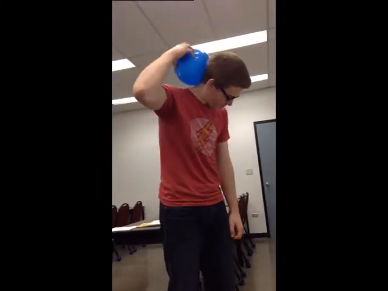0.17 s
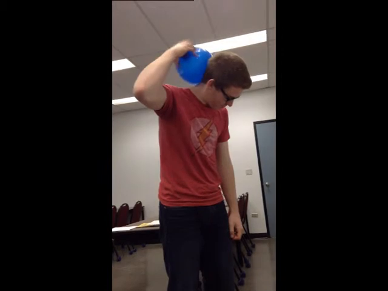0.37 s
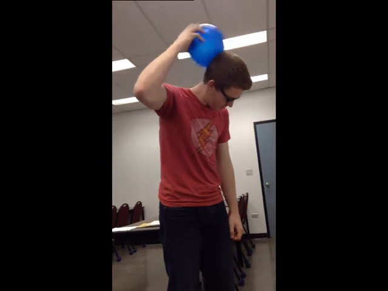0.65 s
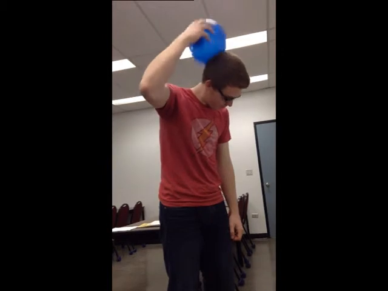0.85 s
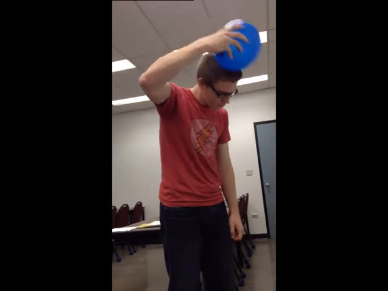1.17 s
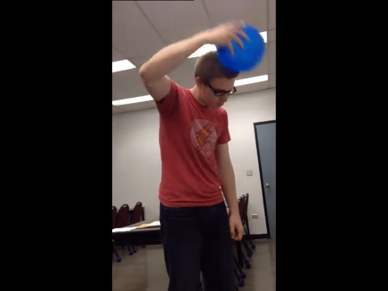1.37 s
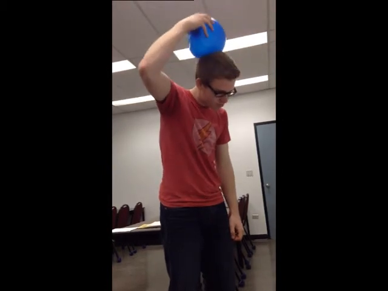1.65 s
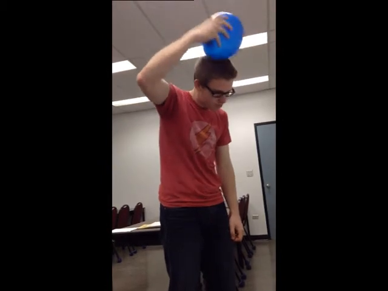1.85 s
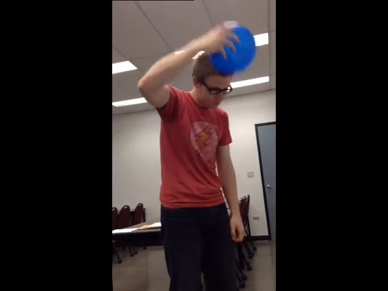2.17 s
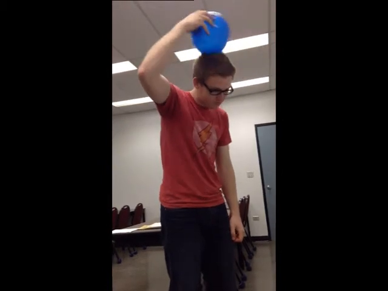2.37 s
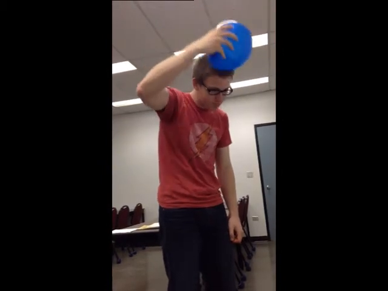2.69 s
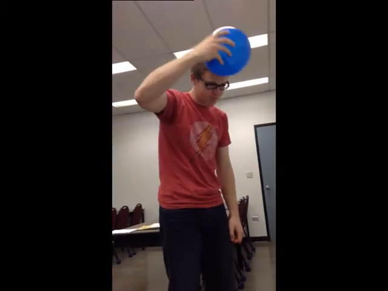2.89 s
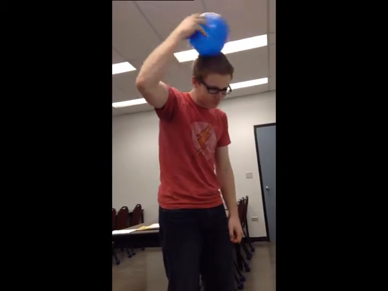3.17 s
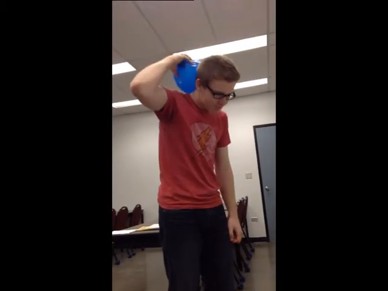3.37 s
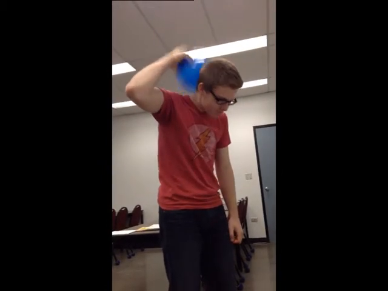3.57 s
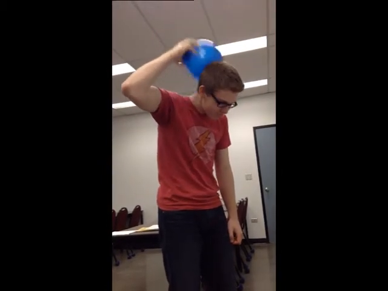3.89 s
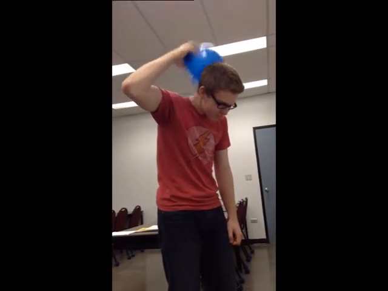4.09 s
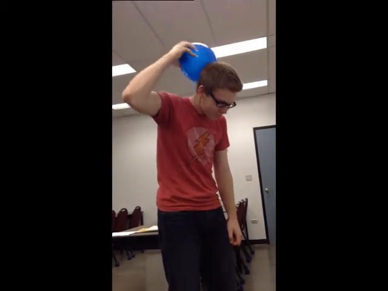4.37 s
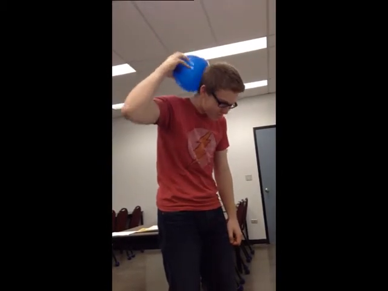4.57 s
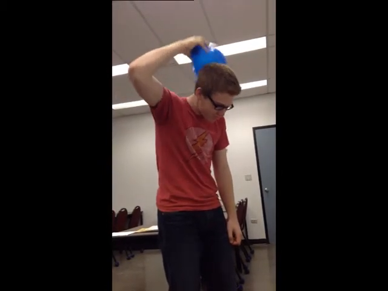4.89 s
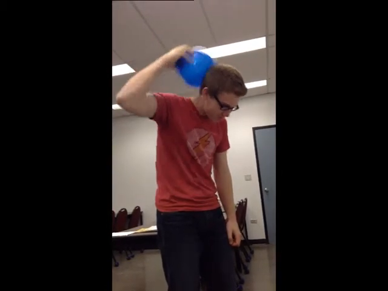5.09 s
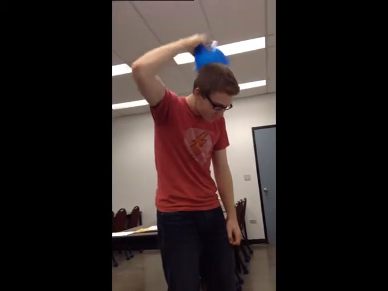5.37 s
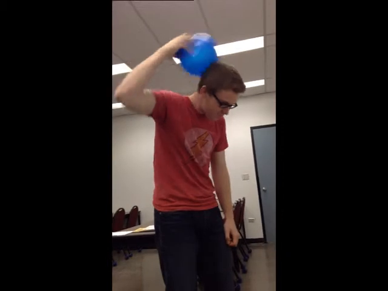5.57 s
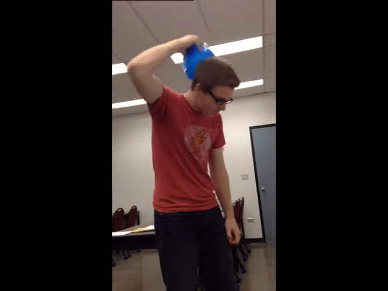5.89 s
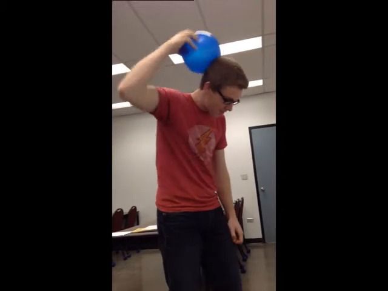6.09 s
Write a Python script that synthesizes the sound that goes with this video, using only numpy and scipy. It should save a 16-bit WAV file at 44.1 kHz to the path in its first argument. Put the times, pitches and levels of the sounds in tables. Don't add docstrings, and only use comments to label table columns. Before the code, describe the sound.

An inflated rubber balloon scrubs fast back and forth on short hair, hissing and squeaky-hollow, then slows to long sweeping rubs in a quiet room.

```python
import sys
import numpy as np
from scipy import signal
from scipy.fft import rfft, irfft, next_fast_len
from scipy.io import wavfile
from scipy.ndimage import uniform_filter1d, map_coordinates

SR = 44100
rng = np.random.default_rng(int(sys.argv[2]) if len(sys.argv) > 2 else 0)


def to_linear_factor(level_db):
    exponent = np.asarray(level_db, float) / 20
    return 10 ** exponent


def file_out(sig):
    cols = np.atleast_2d(sig).T
    lim = np.clip(cols, -1, 1)
    pcm = np.round(lim * 32767).astype(np.int16)
    wavfile.write(sys.argv[1], SR, pcm)


N = 275184
STEP_S = 0.001

# top speed t/s, hiss level/dB, length t/s, shove level/dB, inner air over skin level/dB
STROKES = [(-.012, -43.5, .016, -42, 3.5), (0.064, -34, .015, -46.5, 2), (0.145, -33, .014, -39, 4),
           (0.251, -33.5, 0.016, -34.5, -4.5), (0.336, -37.5, .017, -42.5, 7),
           (0.432, -33.5, 0.016, -48.5, 7), (0.516, -33, .016, -33, -8), (0.621, -32.5, 0.019, -42, 3),
           (0.709, -32.5, 0.015, -36, 1), (0.816, -37, 0.018, -48.5, 6), (3.49, -36.5, 0.018, -45.5, 6.5),
           (3.583, -35, 0.013, -39, -1), (3.684, -33, 0.017, -41, 5), (3.785, -33, 0.019, -42, 7.5),
           (3.878, -34.5, 0.015, -41.5, 3), (3.957, -34, .013, -39, 1.5), (4.054, -33.5, 0.016, -39, -1.5),
           (4.147, -37, .015, -42, -4)]
# start t/s, end t/s, hiss level/dB, drag
# over hiss level/dB
SCRUBS = [
    (-.1, 0.856, -49, 0.5),
    (0.933, 1.046, -46, 1.9),
    (3.493, 4.183, -48, -1),
    (1.29, 1.33, -51, -12),
]
# t/s, length t/s, shove level/dB, inner air over skin level/dB,
# first over second air family level/dB
PRESSES = [(0.842, 0.032, -47.5, -2, -.5), (1, .03, -47, -4, 2), (1.123, .05, -48, -3, -.5),
           (1.408, 0.028, -51, -7, .7), (1.836, 0.06, -53, -1, -.5), (2.198, 0.022, -61, 0, 2),
           (2.607, 0.021, -58, -4, -1.2), (3.056, .04, -65, -1, -1.2), (3.194, .04, -56, -3, .7),
           (3.316, 0.024, -57.5, 8.5, 3), (4.31, .025, -62, 7, 5), (4.406, 0.081, -52.5, -15, -2.5),
           (4.54, .025, -60.5, 10.5, 1.5), (4.65, .08, -53, -6, -.5), (4.888, .04, -56, -2, 1.5),
           (5.12, 0.032, -53, 8, -3), (5.37, 0.056, -54, 2, 3), (5.66, 0.064, -47, -6.5, -5),
           (5.978, .05, -50.5, -22, .7), (6.07, .03, -49, -6, .7), (6.161, 0.037, -54, 8.5, -1.2)]
# t/s, skin over air level/dB, first over second air family level/dB,
# brightness as it turns toward the phone level/dB
SPOT = [(0, -.1, 1.5, -2), (.62, 3, 0.5, -0.5), (.9, 0.5, 2.5, -3), (1.2, 0.5, 2, 2), (1.6, -0.5, -2.5, -2),
        (2, -1.5, 0, 0.3), (2.35, .1, 0.2, -1.5), (2.7, -1.5, -2.5, 0.3), (3.05, -1.5, -1, 0),
        (3.35, -1.5, 1.5, -2), (3.8, 1, 1.5, -2), (4.2, 3, 3.2, -.3), (4.42, -4, -0.5, -1.2),
        (4.56, 1.5, 0.5, 1), (4.95, 0.5, -2.5, -0.8), (5.4, -1.4, -0.5, -1.2), (5.98, 0, -1.2, -0.7),
        (6.24, -.3, -1.5, -0.1)]
# f/Hz, width f/Hz, level/dB
SKIN = [(193.4, 32.6, -5), (235.6, 25.5, 1.5), (335.5, 72, -4)]

SHOVE_LEAN = [0.12, 1.18, .9, 0.63]
FIRST = np.array(np.array([0, 1, -1, 0]))


def unit(x):
    return x / np.sqrt(np.mean(x ** 2) + 1e-20)


def along(points, hz):
    f, v = np.transpose(points)
    return np.interp(np.log(hz + 1), np.log(f + 1), v)


def wobble(rate):
    knots = rng.standard_normal(int(N * rate / SR) + 4)
    return map_coordinates(knots, [np.arange(N) * rate / SR])


def filtered(x, response):
    m = next_fast_len(N + SR // 2)
    return irfft(rfft(x, m) * response(np.fft.rfftfreq(m, 1 / SR)), m)[..., :N]


def modes(table):
    def response(f):
        total = 0
        for k, (centre, width, db) in enumerate(table):
            damping = 1j * f * width
            total = total + (-1) ** k * to_linear_factor(db) * damping / (centre * centre - f * f + damping)
        return total
    return response


def patchy(x, patchy_db):
    z = signal.stft(x, nperseg=512)[2]
    field = uniform_filter1d(rng.standard_normal(z.shape), size=6, axis=0)
    field = uniform_filter1d(field, size=10, axis=1)
    return signal.istft(z * to_linear_factor(patchy_db * unit(field)), nperseg=512)[1][:N]


def slips(spread_db, clump_db, clump_rate):
    size_db = spread_db * np.minimum(rng.exponential(size=N), 3)
    return rng.standard_normal(N) * to_linear_factor(size_db + clump_db * wobble(clump_rate))


def clock():
    return np.arange(0, N / SR + STEP_S, STEP_S)


def full(motion):
    return np.array([np.interp(np.arange(N) / SR, clock(), row) for row in motion])


def curves(rows):
    s, *columns = np.transpose(rows)
    return [np.interp(clock(), s, column) for column in columns]


def bump(s, length, slow_end):
    u = (clock() - s) / length
    return np.exp(-0.5 * (u / np.where(u > 0, slow_end, 1)) ** 2)


def ventilation():
    # f/Hz, level/dB per Hz
    vent = [(20, -14), (50, -52), (80, -23), (112, 0.5), (140, -10), (185, 0.5), (243, -14), (300, -21),
            (443, -43), (591, -18), (1440, -24.5), (5740, -29), (10500, -21), (15500, -27)]
    air = filtered(rng.standard_normal(N), lambda f: to_linear_factor(along(vent, f)))
    return to_linear_factor(-59.5 + 1.2 * wobble(2.4)) * unit(air)


def contact():
    # top speed t/s, hiss level/dB, speeding up t/s, easing off t/s, drag over hiss level/dB
    sweeps = [(1.14, -41.5, 0.069, 0.063, -9), (1.396, -36.5, 0.022, 0.043, -14.5),
              (1.57, -45, 0.091, 0.026, -7.5), (1.77, -39.5, 0.021, 0.062, -14.5),
              (1.98, -43.5, 0.093, 0.031, -7), (2.205, -35.5, .022, .04, -14),
              (2.4, -44.5, 0.089, 0.018, -6.5), (2.49, -57, 0.024, .03, -1), (2.59, -39, .035, 0.044, -11),
              (2.72, -46, .06, 0.068, -9), (3.035, -35, 0.026, 0.036, -15), (3.215, -40, 0.081, .02, -9.5),
              (3.325, -48, 0.027, 0.027, -2.5), (4.37, -45.5, 0.036, 0.05, -10),
              (4.51, -40.5, 0.063, 0.035, -14.5), (4.68, -44.5, 0.097, 0.13, -7),
              (4.92, -40, 0.027, 0.071, -13), (5.07, -39, 0.057, 0.042, -12.5),
              (5.25, -44, 0.038, 0.15, -7), (5.43, -40.5, 0.033, 0.073, -21),
              (5.56, -38.5, 0.026, .07, -13), (5.82, -48, 0.15, 0.059, -4),
              (6.025, -38, 0.052, 0.059, -12.5), (6.14, -38, 0.019, 0.046, -12.5)]
    settle_s = 0.023
    t = clock()
    power = to_linear_factor(2 * -68)
    for s, db, rise, fall, drag_db in sweeps:
        power = power + to_linear_factor([[2 * db], [2 * (db + drag_db)]]) * bump(s, rise, fall / rise)
    for start, end, db, drag_db in SCRUBS:
        outside = t - np.clip(t, start, end)
        touch = np.exp(-0.5 * (outside / settle_s) ** 2)
        power = power + to_linear_factor([[2 * db], [2 * (db + drag_db)]]) * touch
    return power


def hair():
    # f/Hz, level/dB per Hz
    hair_tone = [(1470, -23.5), (2500, -8.5), (3000, -7.5), (3290, -7), (5420, -7), (5940, -4),
                 (8850, -4.5), (10700, -0.5), (12000, -5), (14100, -5.5), (15600, -13)]
    power = contact()[0]
    for s, db, length, *_ in STROKES:
        power = power + to_linear_factor(2 * db) * bump(s, 0.56 * length, slow_end=1.66)
    tips = patchy(slips(spread_db=1.5, clump_db=0.7, clump_rate=70), patchy_db=1.35)
    tips = unit(filtered(tips, lambda f: to_linear_factor(along(hair_tone, f))))
    top = filtered(tips, lambda f: 1 / (1 + (8000 / (f + 1)) ** 4))
    speed_db = 10 * np.log10(power) + 44.0
    tilt = to_linear_factor(curves(SPOT)[2] + 0.18 * speed_db)
    power, tilt = full([power, tilt])
    tilted = (tips - top) / tilt + top * tilt
    return np.sqrt(power) * tilted / np.sqrt(0.13 / tilt ** 2 + 0.47 * tilt ** 2)


def drag():
    drag_db = np.array([-1, -4.5, -6.5, 0.5])
    press_db = np.array([-2.5, -5.5, -6.5, -5.5])
    stroke_rasp_db = -15
    scrub_rasp_db = -5
    t = clock()
    skin_db = curves(SPOT)[0]
    lean_db = np.array([skin_db, -skin_db, -skin_db, 0 * skin_db])
    pull = np.sqrt(contact()[1]) * to_linear_factor(drag_db[:, None] + lean_db)
    scrubbing = sum((t > start) & (t < end) for start, end, *_ in SCRUBS[::2])
    pull[3] *= to_linear_factor(scrub_rasp_db * scrubbing)
    for s, db, length, *_ in STROKES:
        pull[3] += to_linear_factor(db + stroke_rasp_db) * bump(s, length, slow_end=1.15)
    for s, length, push_db, air_db, family in PRESSES:
        layer_db = push_db + press_db + family * FIRST + air_db * np.array(SHOVE_LEAN)
        pull += to_linear_factor(layer_db)[:, None] * bump(s, 0.61 * length, slow_end=1.14)
    return pull


def shoves():
    shove_db = np.array([-2, -0.5, -4, -1])
    shove_lag = [0.35, 0.22, 0.85, 0.44]
    shove_end = [1, 1.03, 2.2, 0.99]
    shove = np.zeros((4, len(clock())))
    for s, _, length, push_db, air_db in STROKES:
        tone_db = shove_db + air_db * np.array(SHOVE_LEAN)
        shapes = [bump(s + lag * length, 0.67 * length, end) for lag, end in zip(shove_lag, shove_end)]
        shove += to_linear_factor(push_db + tone_db)[:, None] * shapes
    return shove


def balloon():
    # f/Hz, width f/Hz, level/dB
    air_low = [(452, 53, -7), (549.3, 50, 2.5), (620, 47, -3.5)]
    # f/Hz, width f/Hz, level/dB
    air_high = [(672, 35, 2.5), (786, 40, -4.5)]
    # f/Hz, width f/Hz, level/dB
    rasp = [(954, 203, -1), (1107, 51, 6.5), (1266, 186, 3.5), (1780, 335, 5.5), (2090, 620, 1.5),
            (3140, 570, -5)]
    layer_drift_db = [1.2, 1.5, 1.5, .4]
    drift_rate = 12
    light_hz, light_width_hz, light_loss = 395, 245, 0.42

    family = to_linear_factor(FIRST[:, None] * curves(SPOT)[1])
    drift = to_linear_factor(np.array([db * wobble(drift_rate) for db in layer_drift_db]))
    steady_layers = full(drag() * family) * drift
    sudden_layers = full(shoves() * family)
    out = np.zeros(N)
    for steady, sudden, table in zip(steady_layers, sudden_layers, (SKIN, air_low, air_high, rasp)):
        force = unit(patchy(slips(spread_db=3.0, clump_db=0.5, clump_rate=30), patchy_db=1.73))
        pressed = [(c, 1.5 * w, db - 2.5) for c, w, db in table]
        ring = filtered(steady * force, modes(table))
        ring += filtered(sudden * rng.standard_normal(N), modes(pressed))
        out += ring / np.std(filtered(force, modes(table)))
    t = clock()
    light = (t > SCRUBS[1][1]) & (t < SCRUBS[2][0])
    light = full([uniform_filter1d(light * 1.0, size=90)])[0]
    asleep = filtered(out, modes([(light_hz, light_width_hz, 0)]))
    return out - light_loss * light * asleep


def room(x):
    # f/Hz, t60 t/s
    walls = [(200, 0.71), (2000, 0.81), (12000, 0.6)]
    hz, t, z = signal.stft(rng.standard_normal(SR // 2), SR, nperseg=256)
    fade = to_linear_factor(-60 * t / along(walls, hz)[:, None])
    tail = signal.istft(z * fade, SR, nperseg=256)[1]
    delayed = np.pad(x, (350, 0))
    return signal.fftconvolve(delayed, tail / np.linalg.norm(tail))[:N]


def moan():
    moan_db, moan_lean, wander_hz = -9, 0.75, 8.99
    level = 0
    for s, length, db, air_db, _ in PRESSES:
        level = level + to_linear_factor(db + moan_db - moan_lean * air_db) * bump(s, length, slow_end=1.06)
    level, = full([level])
    hz = SKIN[1][0] + wander_hz * wobble(14)
    return level * to_linear_factor(2.3 * wobble(25)) * np.sin(2 * np.pi * np.cumsum(hz) / SR)


def jerks():
    # t/s, peak level/dB, crack level/dB, slips in the run [count]
    jerk_runs = [(.8887, -16, -12, 4), (0.912, -21, -5.5, 1), (.915, -18, -19, 3), (0.9377, -15.5, -17, 4),
                 (0.957, -30, -17, 1), (0.965, -19.5, -10, 1), (.993, -36, -19, 1), (1.0383, -20, -14, 2),
                 (1.044, -22, -18, 2), (1.055, -20, -16, 2), (1.0618, -22, -16, 2), (1.296, -31, -18, 2),
                 (2.279, -27.5, -12, 1), (2.518, -37, 0, 1), (3.303, -38, -14, 1)]
    slip_gap_s, slip_loss_db, crack_gain_db = 0.0027, 3.3, 0.5
    push_s, push_grows = 0.3 / 5000, 1.5
    # f/Hz, width f/Hz, level/dB
    squeezed = [(284, 150, 3.0), (656, 88, 5.5), (1206, 190, -1.0), (2950, 260, -10)]
    force, crack = np.zeros(N + SR), np.zeros(N + SR)
    t = np.arange(SR // 50) / SR
    for start, peak_db, crack_db, count in jerk_runs:
        for k in range(count):
            at = round((start + k * slip_gap_s) * SR)
            db = peak_db - k * slip_loss_db
            u = t / (push_s * push_grows ** k)
            force[at:][:len(t)] -= to_linear_factor(db + 3.5) * u * np.exp(1 - u)
            burst = rng.standard_normal(len(t)) * np.exp(-t / 0.0013)
            crack[at:][:len(t)] += to_linear_factor(db + crack_db + k * crack_gain_db + 8.0) * burst
    ring = filtered(force[:N], lambda f: modes(squeezed)(f) * 1j * f / (150 + 1j * f))
    return ring + filtered(crack[:N], modes([(3070, 2500, 0)]))


def scene():
    near = hair() + balloon() + moan() + jerks()
    return np.tile(to_linear_factor(-1.33) * near + to_linear_factor(-10.5) * room(near) + ventilation(), (2, 1))


def low_pass(x):
    return signal.sosfilt(signal.butter(12, 15960, fs=SR, output="sos"), x)


def record(dry):
    mid = filtered(dry[0], lambda f: (1j * f / (50 + 1j * f)) ** 3 * (f < 15660))
    return low_pass(np.tile(mid, (2, 1)))


dry = scene()
out = record(dry)
file_out(out)
```